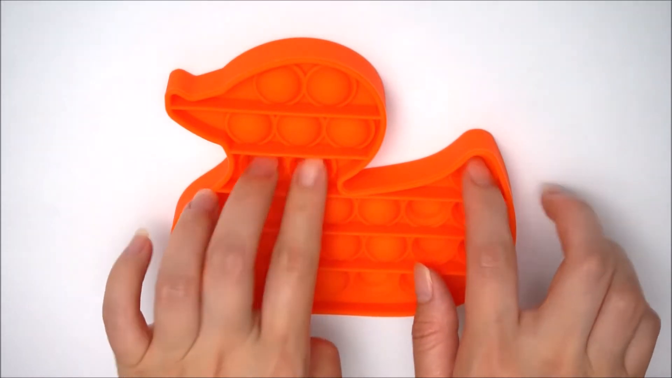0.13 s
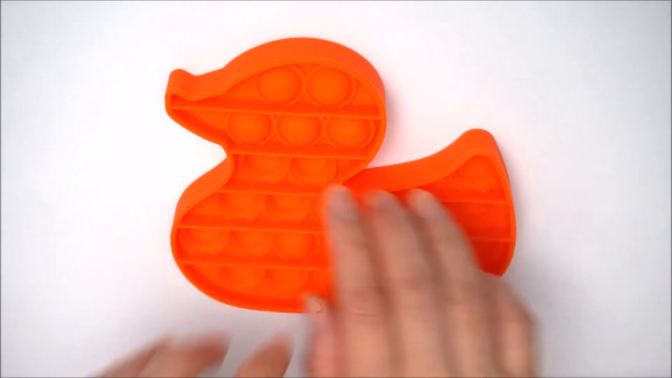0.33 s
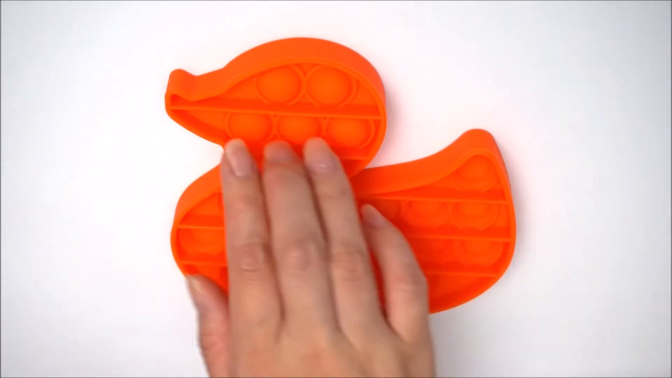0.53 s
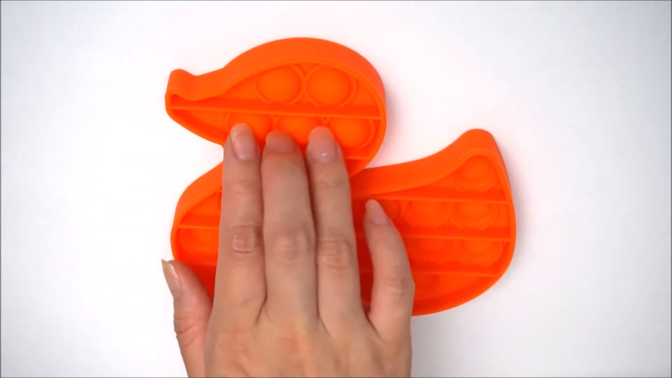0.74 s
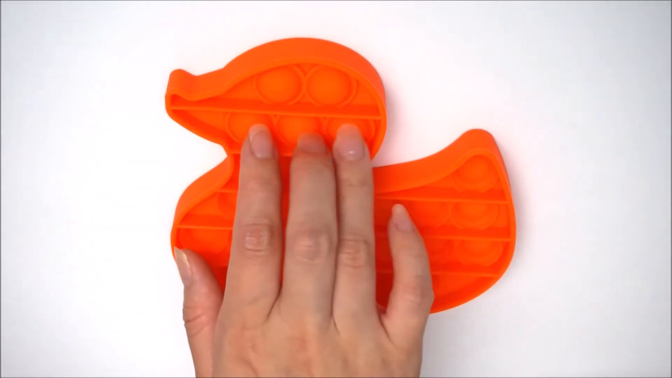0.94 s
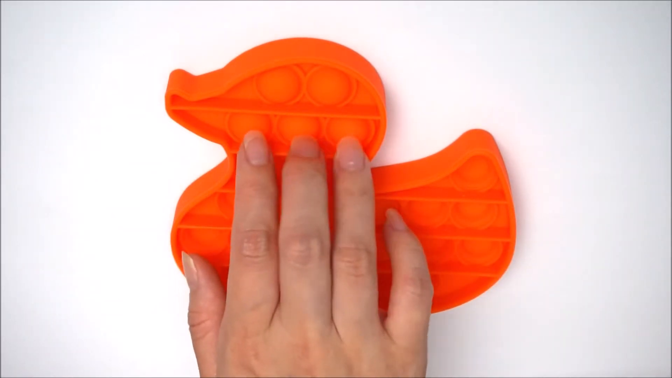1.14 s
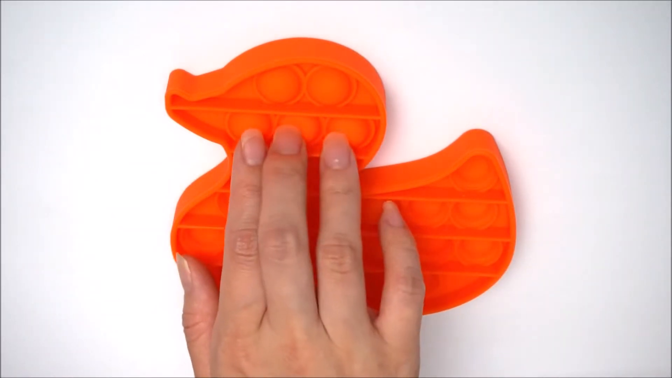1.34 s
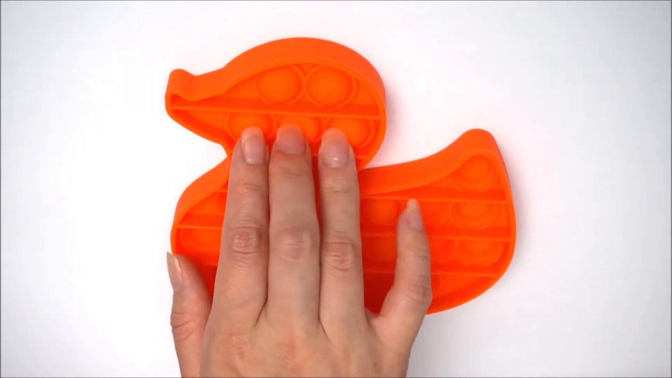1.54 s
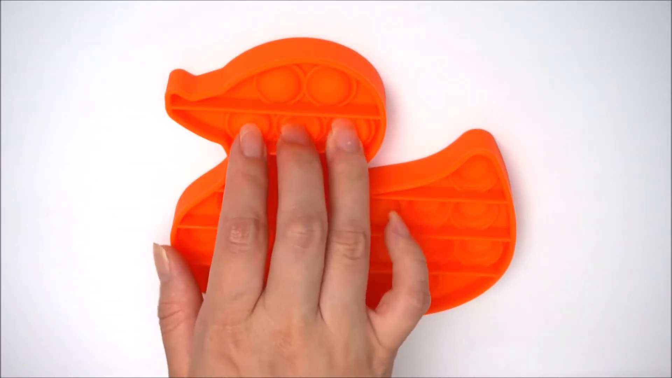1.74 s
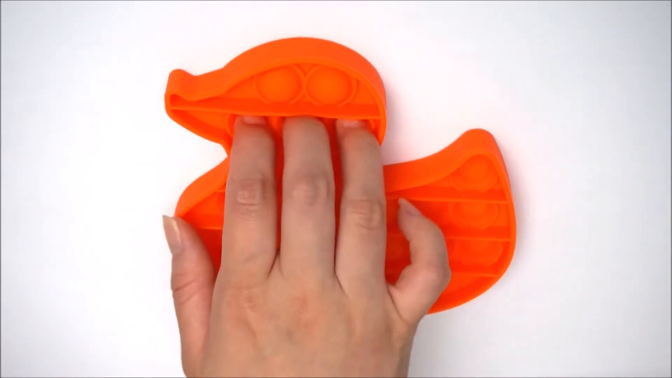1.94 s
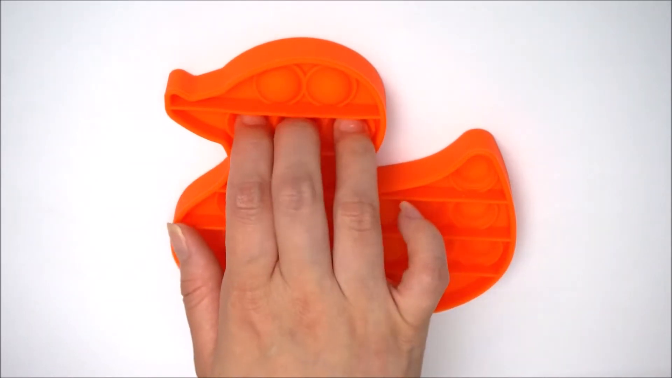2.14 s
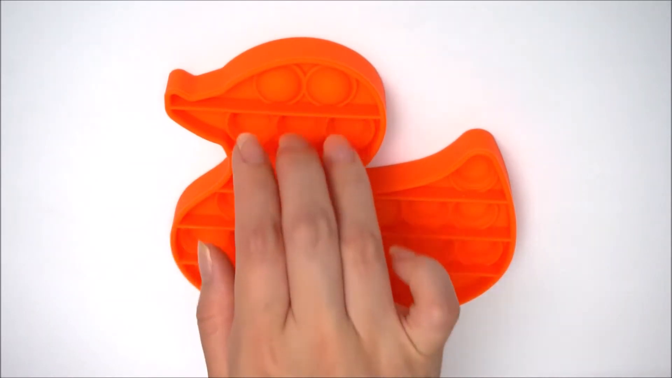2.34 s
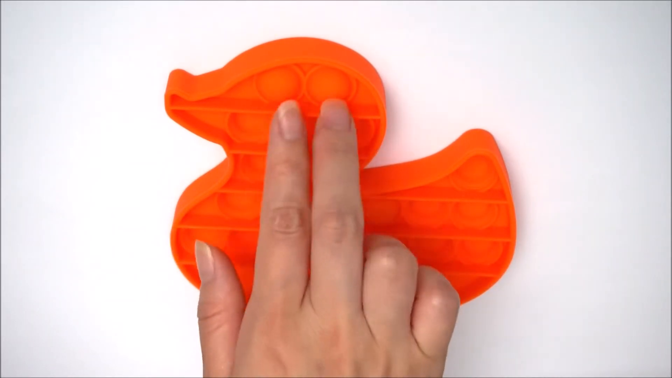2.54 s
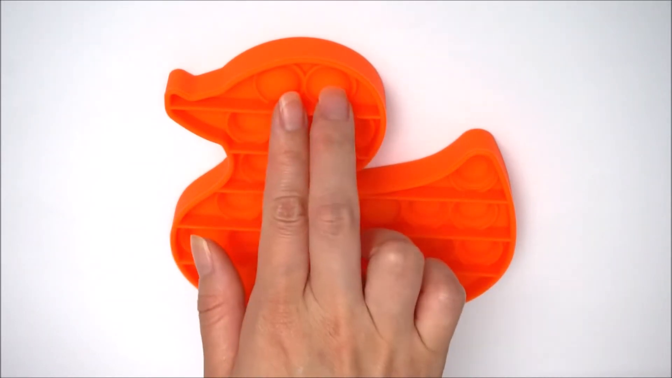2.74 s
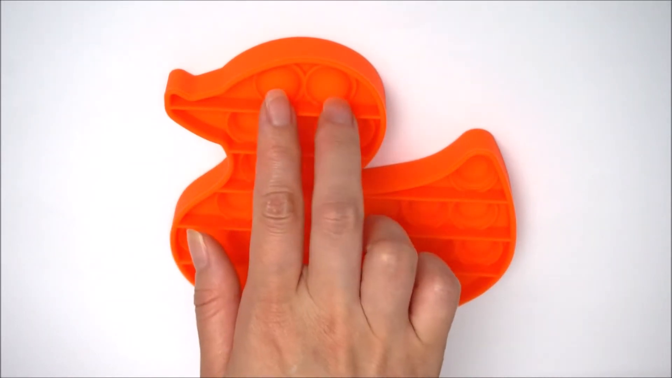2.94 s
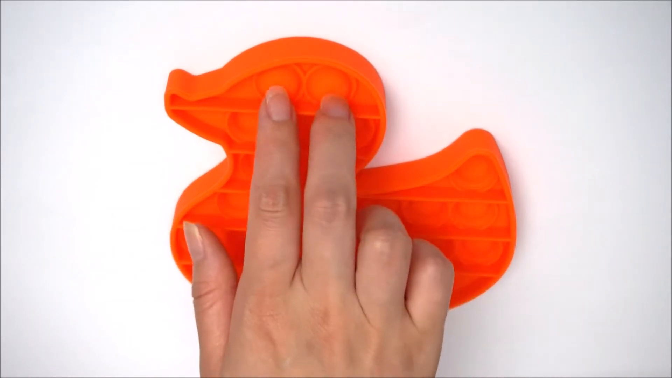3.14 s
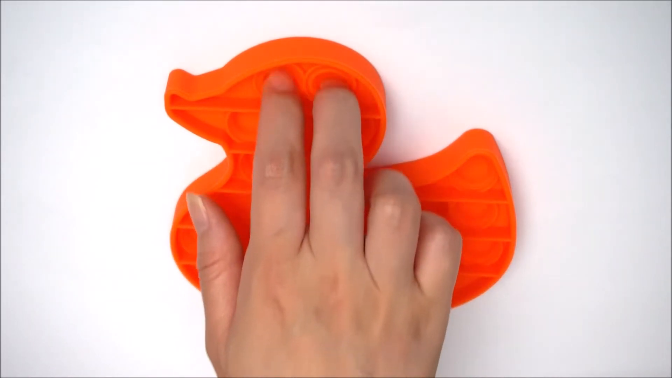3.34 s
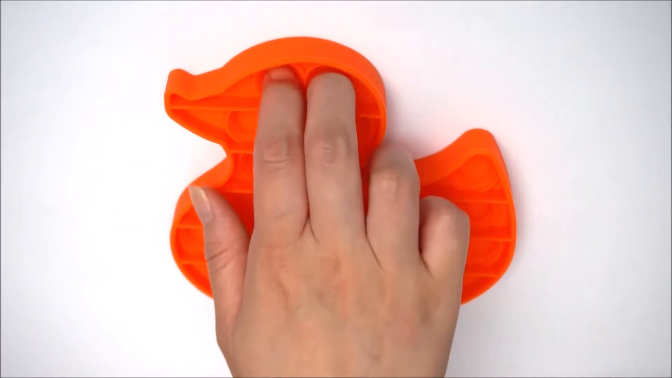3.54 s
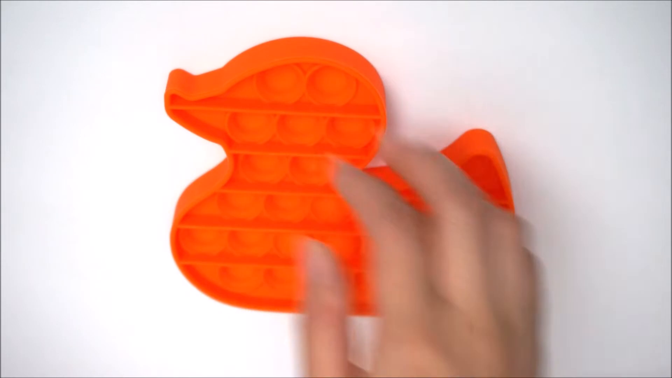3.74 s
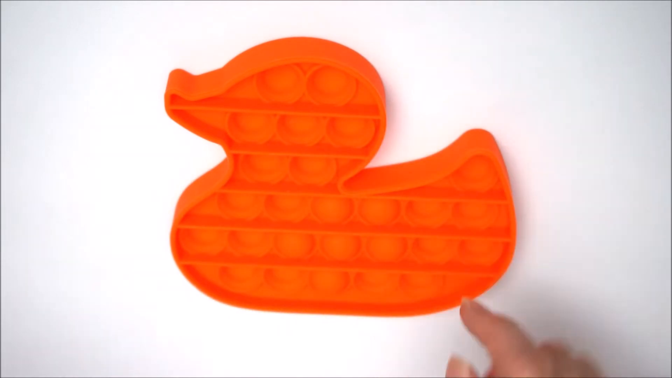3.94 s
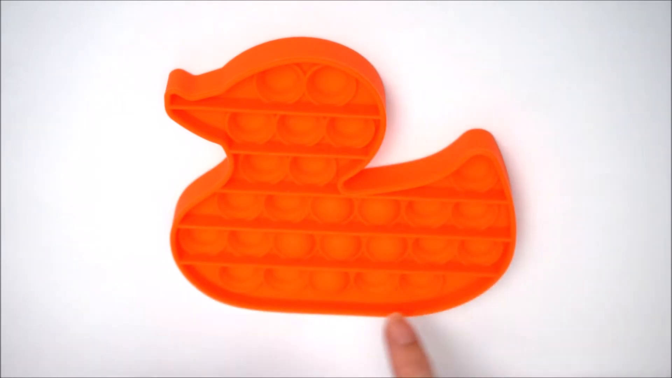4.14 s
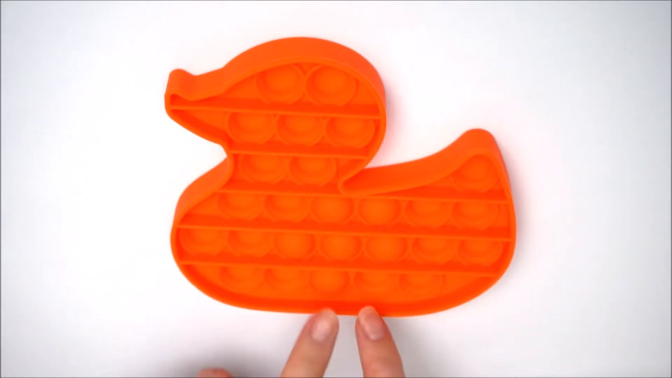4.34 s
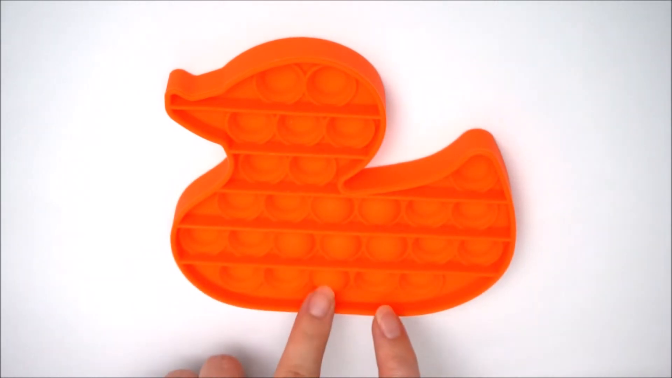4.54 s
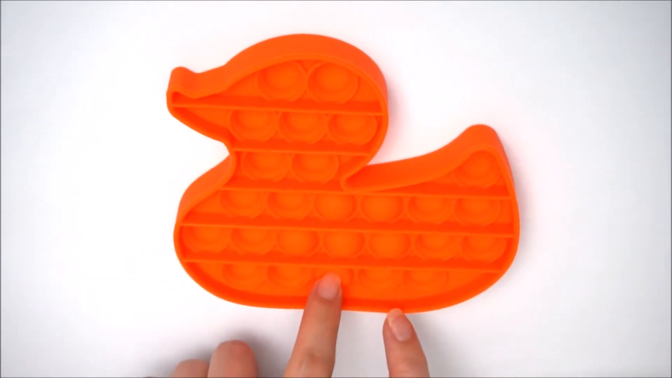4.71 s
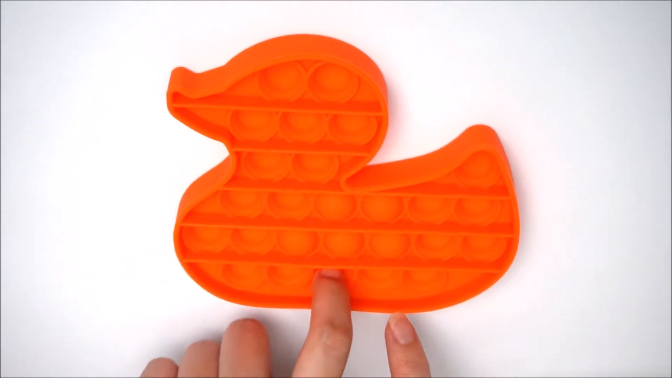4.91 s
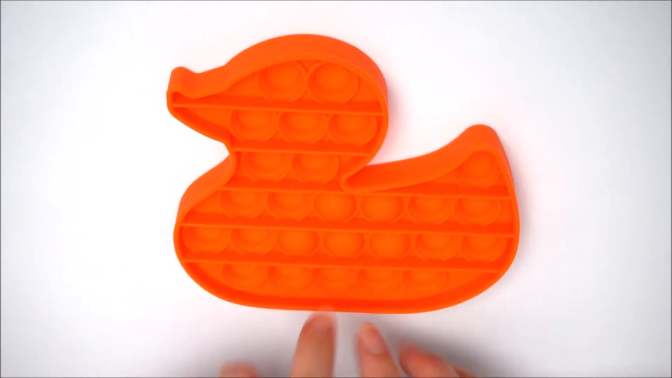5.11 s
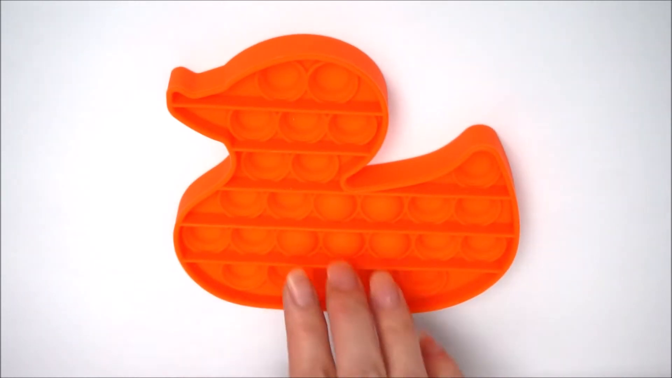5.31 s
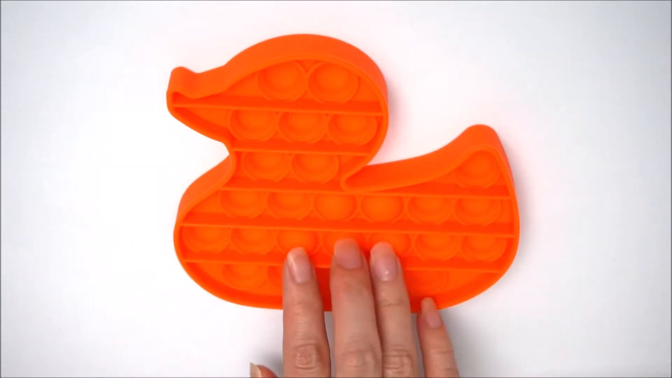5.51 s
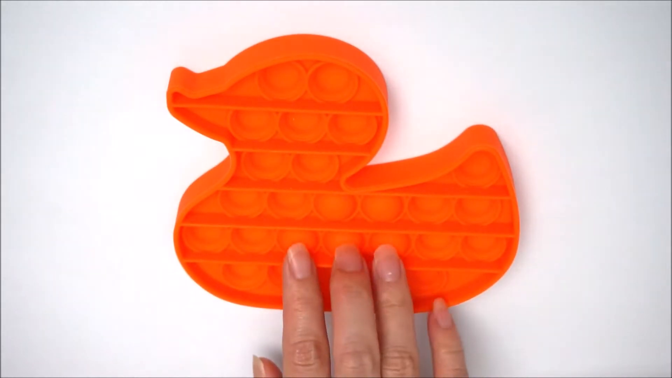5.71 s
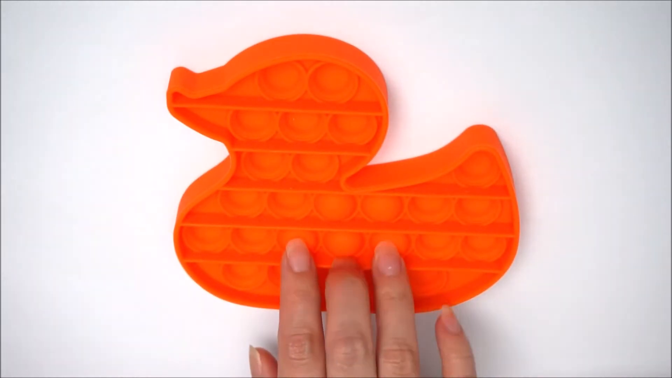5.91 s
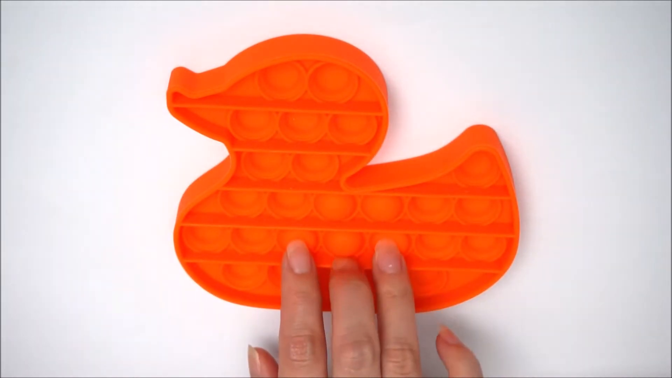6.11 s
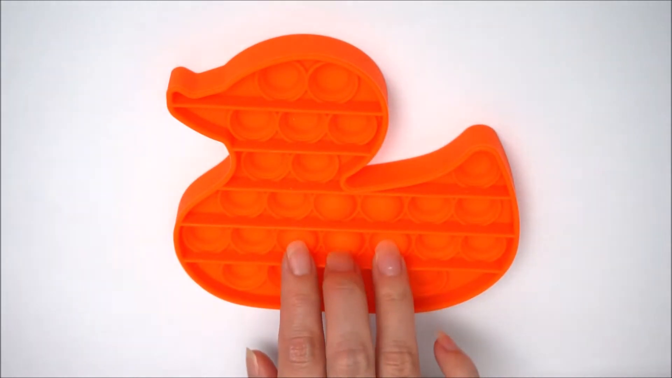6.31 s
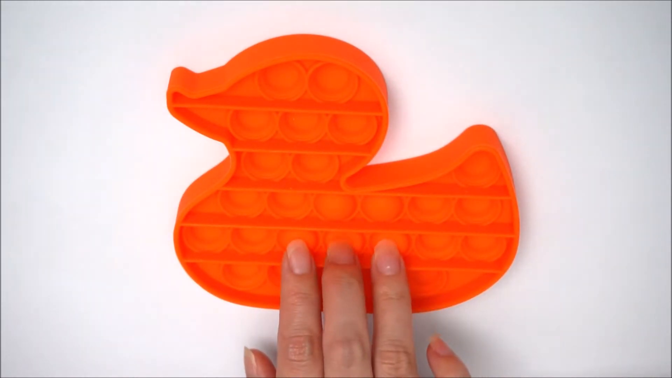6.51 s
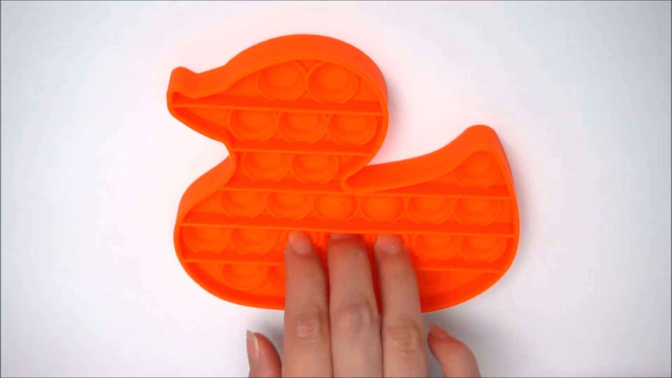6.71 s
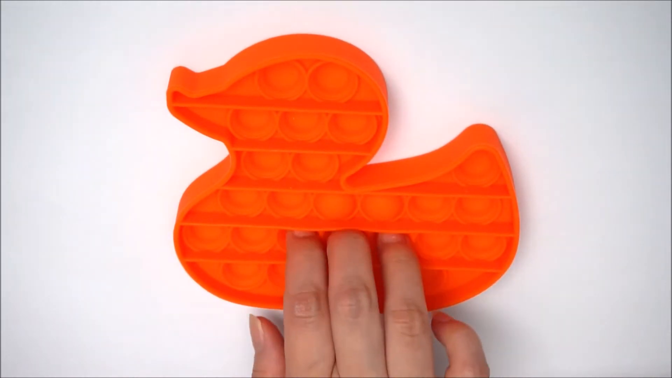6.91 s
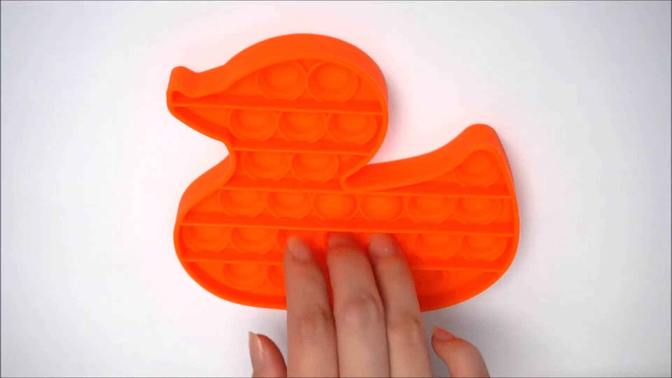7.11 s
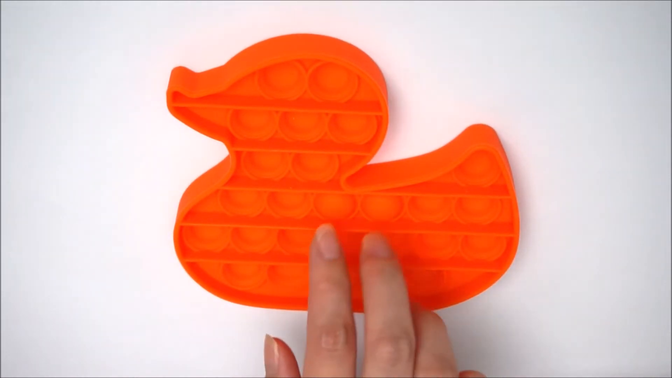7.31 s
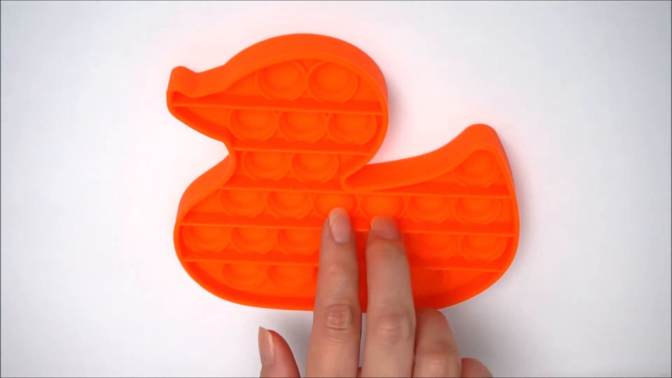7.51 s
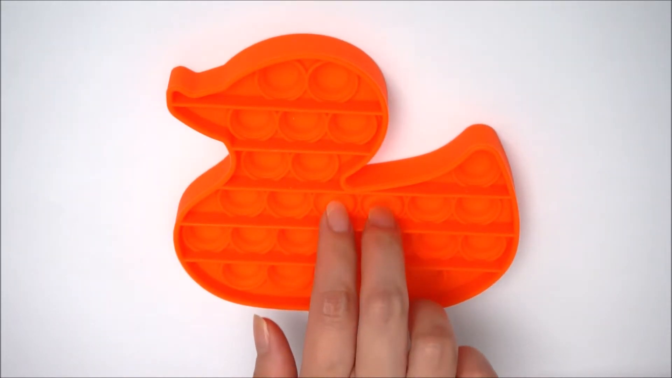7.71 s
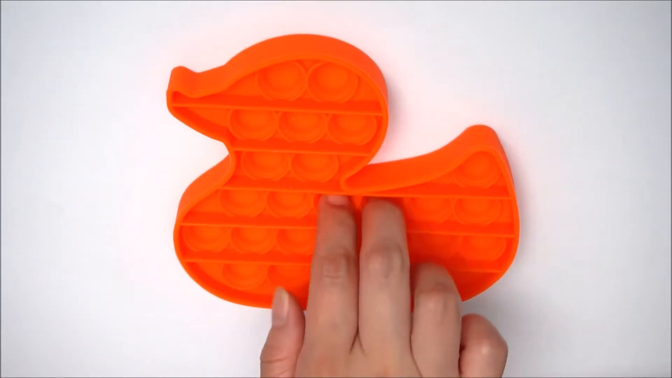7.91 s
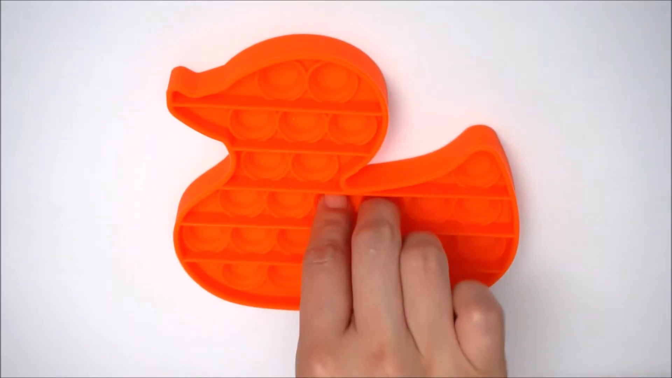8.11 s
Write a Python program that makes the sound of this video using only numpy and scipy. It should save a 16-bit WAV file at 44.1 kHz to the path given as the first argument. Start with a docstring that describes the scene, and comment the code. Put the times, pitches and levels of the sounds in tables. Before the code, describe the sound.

Fingers press the domes of a silicone bubble toy on a table in a small room. A hand brushes the tabletop faintly and a few dull thuds sound, then comes a quick run of soft pops with a brief scuff. Four more short clusters of pops follow, a second or two apart, with another brush and two light fingertip taps in between. A pair of microphones picks up slight echo and a steady hush.

```python
"""Quick runs of soft pops: fingers press the domes of a silicone bubble toy on a table in a small room.
Each dome snaps inside out, which makes its skin and the air trapped under it ring for a moment.
Nearby surfaces and the room echo the pops and two light fingertip taps. A hand brushes the table.
Dull thuds, a scuff and one faint hoot sound over a steady hush, all heard by a pair of microphones."""
import sys
import numpy as np
from scipy import signal
from scipy.fft import rfft, irfft
from scipy.io import wavfile
from scipy.ndimage import uniform_filter1d

SR = 44100
rng = np.random.default_rng(int(sys.argv[2]) if len(sys.argv) > 2 else 0)


def transcribe(signal):
    """Save signal, clipped to [-1, 1], as a 16-bit WAV file at the path in sys.argv[1]."""
    frames = np.atleast_2d(signal).T
    limited = np.clip(frames, -1, 1)
    pcm = np.round(limited * 32767).astype(np.int16)
    wavfile.write(sys.argv[1], SR, pcm)


N = 359415


def undb(db):
    """Turn decibels (dB) into a number to multiply a sound by."""
    return 10 ** (np.asarray(db) / 20)


def on_hz(table, hz):
    """Read between rows of (frequency in Hz, value), giving each octave equal space."""
    freqs, values = np.transpose(table)
    return np.interp(np.log(np.maximum(hz, 1)), np.log(freqs), values)


def noise(colour, alike):
    """Stereo noise at level 1. By frequency, colour sets its strength, alike how well the sides agree."""
    hz = np.arange(N // 2 + 1) * SR / N
    likeness = np.clip(alike(hz), -1, 1)
    mid, side = rfft(rng.standard_normal((2, N))) * colour(hz) * np.sqrt([1 + likeness, 1 - likeness])
    out = irfft(np.array([mid + side, mid - side]), N)
    return out / np.sqrt(np.mean(out ** 2))


def panned(db):
    """Left and right gains, with the left louder by db."""
    return undb(np.array([[db], [-db]]) / 2)


def band(x, lo_hz, hi_hz, order=2):
    """Keep mainly the sound between two frequencies."""
    sos = signal.butter(order, [lo_hz, min(hi_hz, .45 * SR)], "band", fs=SR, output="sos")
    return signal.sosfilt(sos, x)


def swell(peak_s, db, rise_s, fall_s):
    """A gain with a rounded peak: it climbs 20 dB per rise_s, then sinks 20 dB per fall_s."""
    t = np.arange(N) / SR - peak_s
    return uniform_filter1d(undb(db - 20 * np.maximum(-t / rise_s, t / fall_s)), size=1500)


def hush():
    """Room hush whose bass slowly swells; the spaced microphones agree most in the bass."""
    # Tone of the hush. Each row: frequency in Hz, relative level in dB.
    colour = [(13, -61), (22, -9.5), (92, -3), (234, -8.5), (284, -6.5), (417, -8.5), (630, -9), (722, -10),
              (977, -13), (1440, -15), (1940, -17.5), (13300, -27.5), (15700, -29.5)]
    # Each row: frequency in Hz, how alike left and right are (1 the same, 0 unrelated, -1 opposite).
    likeness = [(60, 0.87), (130, 0.82), (290, 0.19), (640, -0.24), (1410, -0.23), (3100, -0.0099),
                (6820, 0.044), (15000, 0.45)]
    # Slow swells. Each row: time in seconds, bass boost in dB.
    bass_swells = [(0, 3), (.3, -0.5), (1, -1.5), (3, -0.5), (3.8, 2), (4.7, 0.3), (5.4, 1.5), (6.3, 0.1),
                   (8.15, -0.5)]
    air = undb(-50.5) * noise(lambda hz: undb(on_hz(colour, hz)), lambda hz: on_hz(likeness, hz))
    bass = signal.sosfiltfilt(signal.butter(1, 900, fs=SR, output="sos"), air)  # below 900 Hz
    times, boost_db = np.transpose(bass_swells)
    return air - bass + bass * undb(np.interp(np.arange(N) / SR, times, boost_db))


def hoot(start_s=.015, end_s=.11, hz=355, db=-55):
    """A short, faint tone with soft ends."""
    t = np.arange(N) / SR
    gate = uniform_filter1d(1. * (t > start_s) * (t < end_s), size=600)
    return undb(db) * np.sqrt(2) * gate * np.sin(2 * np.pi * hz * t)


def thuds(rise_s=.12):
    """Dull bumps come through the floor, nearly the same at both microphones."""
    # Each row: peak time in seconds, level in dB, seconds to fall by 20 dB.
    bumps = [(1.184, -44, .36), (1.514, -47, .15), (1.576, -41.5, .33), (1.852, -47.5, .3),
             (1.964, -39.5, .2), (2.124, -48, .11)]
    # Tone of a thud. Each row: frequency in Hz, relative level in dB.
    colour = [(21, -61), (35, -7), (70, 6), (183, 2.5), (258, -7.5), (299, -2), (1200, -19.5), (1560, -43),
              (2640, -120)]
    gain = np.max([swell(s, db, rise_s, fall_s) for s, db, fall_s in bumps], axis=0)
    return gain * noise(lambda hz: undb(on_hz(colour, hz)), lambda hz: np.exp(-hz / 1500))


def scuff():
    """Something slides briefly: a hiss that is strongest around a few pitches."""
    # Each row: centre frequency in Hz, width in Hz, relative level in dB.
    resonances = [(3240, 1100, 10), (5000, 400, -6), (4500, 10500, 1)]

    def colour(hz):
        return sum(undb(db) / (1 + (2 * (hz - centre) / width) ** 2) for centre, width, db in resonances)
    gain = swell(peak_s=1.97, db=-45.3, rise_s=.09, fall_s=.27)
    return gain * noise(colour, lambda hz: np.full_like(hz, .38))


def brush():
    """A hand sweeps over the smooth table top with a soft, bright hiss."""
    # Each row: peak time in seconds, level in dB, seconds to rise and to fall by 20 dB,
    # left minus right in dB.
    strokes = [(.63, -58, .19, .25, -.45), (.782, -58, .19, .27, -.45), (3.804, -55.5, .35, .3, -3),
               (4.084, -48.3, .75, .48, -1.4)]
    # Tone of the hiss. Each row: frequency in Hz, relative level in dB.
    colour = [(800, -17), (2000, -2.5), (5000, 1), (9000, 4), (12000, 5.5), (16000, 0.5)]
    hiss = noise(lambda hz: undb(on_hz(colour, hz)) * (hz > 500), lambda hz: np.full_like(hz, .35))
    gains = [panned(pan_db) * swell(s, db, rise, fall) for s, db, rise, fall, pan_db in strokes]
    return hiss * np.max(gains, axis=0)


def taps():
    """Fingertips land lightly on the silicone, each a tiny burst of noise."""
    # Each row: start in seconds, level before filtering in dB, low and high edge in Hz,
    # fade time in ms, left minus right in dB.
    touches = [(5.824, -35, 2180, 4400, 4.7, -5), (7.424, -40, 900, 2600, 3, -2.5)]
    out = np.zeros((2, N))
    size = 1500
    for s, db, lo_hz, hi_hz, fade_ms, pan_db in touches:
        fade = np.exp(-np.arange(size) * 1000 / SR / fade_ms)
        burst = band(rng.standard_normal(size) * fade, lo_hz, hi_hz)
        start = int(s * SR)
        out[:, start:start + size] += undb(db) * panned(pan_db) * burst
    return out


def pops(crack_fade_ms=.93, tick_fade_ms=1):
    """Domes snap through: trapped air and skin ring, and the flip cracks, ticks and knocks the table."""
    # Each row is one pop: time in seconds; the air's level in dB, pitch in Hz and ring time in ms;
    # the same three for the skin; rise time in ms; crack, tick and knock levels in dB.
    # Levels are before filtering, and all the others are relative to the air's.
    domes = [(1.8009, -35, 690, 5.5, -21.4, 2856, 1.5, 0.44, -22, -20, -19),
             (1.8384, -19, 680, 9.3, -2, 1800, 1.7, 0.16, -19, -32, -8),
             (1.8546, -19.7, 854, 6.3, -22.6, 2570, 1.8, 0.72, -20, -33, -11),
             (1.8824, -9, 885, 4.4, -25, 1950, 1.9, 0.46, -26, -32, -11),
             (1.8881, -7.5, 1020, 2.2, -7, 1950, 0.5, 0.2, -25, -37, -10.5),
             (1.8964, -11, 910, 11, 0, 1590, 2.2, 0.18, -12.5, -27, -27),
             (3.2918, -19.5, 730, 5.6, -15, 1510, 2.4, 0.42, -32, -37, -13),
             (3.3532, -17, 760, 5.8, -5, 2270, 1, 0.13, -18, -29, -31),
             (3.3737, -8, 920, 9.0, -6, 1440, 4.7, 0.16, -25, -39, -23),
             (3.4138, -6.5, 1050, 4.3, -8.5, 1490, 8, 0.097, -18, -36, -17),
             (4.7399, -24.5, 780, 4.7, 2.5, 1270, 3.8, 0.097, -22, -22, -20),
             (4.7981, -13, 880, 4.8, 4.2, 1385, 4.4, 0.12, -10.5, -25, -29),
             (6.6345, -18, 630, 4, 2, 1850, 1, 0.2, -23, -33, -17),
             (6.6599, -9.5, 900, 2.6, -3, 1700, 0.65, 0.34, -19, -23, -26),
             (6.6949, -24.5, 710, 5, 1, 1340, 3, 0.5, -21.5, -32, -19),
             (6.7279, -19.5, 830, 3.9, -11, 1170, 11, 0.25, -24, -32, -10),
             (6.756, -0.5, 1320, 2.2, -13.5, 2310, 5, 0.12, -29.5, -40, -37),
             (6.787, 0, 1180, 3.6, -26, 2360, 0.91, 0.12, -27.5, -38, -38),
             (7.7887, -12, 880, 3.8, -7.5, 2300, 2.7, 0.16, -20, -12.5, -30),
             (7.8038, -23.6, 790, 6.5, -12, 1100, 7.7, 0.39, -18, -23.2, -18),
             (7.8299, -3, 1090, 2.1, -4, 2180, 2.1, 0.3, -16, -32, -37),
             (7.8486, -1.5, 1240, 2.4, -18, 2150, 0.93, 0.056, -19, -34.4, -37)]
    # The table top's notes. Each row: pitch in Hz, ms to fade by 60 dB, relative level in dB.
    table_notes = [(362, 32.5, -6.5), (487, 9.6, 0)]
    # The crack of the dome's rim. Each row: low and high edge in Hz, relative level in dB.
    rim_bands = [(2100, 3700, -3), (3900, 4760, -0.5)]
    body, cracks, ticks = np.zeros((3, 2, N))
    lead, size = 100, 1800  # samples before the snap, and in the whole pop
    for s, db, air_hz, air_ms, skin_db, skin_hz, skin_ms, rise_ms, crack_db, tick_db, knock_db in domes:
        start = int(s * SR) - lead
        span = slice(start, start + size)
        t = (start + np.arange(size)) / SR - s
        ms = np.maximum(t, 0) * 1000
        rise = np.exp(-.5 * (np.minimum(t, 0) * 1000 / rise_ms) ** 2)
        gain = undb(db) * panned(-.6) * rise
        # the fingertip sinks onto the flipped dome, so the ring holds and then chokes
        air = np.cos(2 * np.pi * air_hz * t) * undb(-60 * (ms / air_ms) ** 2)
        skin = np.cos(2 * np.pi * skin_hz * t) * undb(skin_db - 60 * (ms / skin_ms) ** 2)
        knock = sum(undb(knock_db + note_db - 60 * ms / fade_ms) * np.sin(2 * np.pi * hz * ms / 1000)
                    for hz, fade_ms, note_db in table_notes)
        body[:, span] += gain * (air + skin + knock)
        grit = rng.standard_normal((4, size))
        cracks[:, span] += gain * undb(crack_db) * np.exp(-ms / crack_fade_ms) * grit[3]
        ticks[:, span] += gain * undb(tick_db) * np.exp(-ms / tick_fade_ms) * (grit[0] + .5 * grit[1:3])
    # soft silicone gives off neither deep bass nor treble
    body = band(body, lo_hz=297, hi_hz=3660, order=4)
    rim = sum(undb(db) * band(cracks, lo_hz, hi_hz, order=1) for lo_hz, hi_hz, db in rim_bands)
    return body + rim + band(ticks, lo_hz=5300, hi_hz=10900, order=1)


def room(dry, rise_ms=4, alike_hz=5000, echo_top_hz=4000):
    """Add a few dull echoes from nearby surfaces and the room's fading wash of sound."""
    # The room's fading wash, in bands half an octave wide.
    # Each row: centre in Hz, seconds to fade by 60 dB, level in dB.
    wash_bands = [(270, 0.16, -29), (356, 0.11, -30.5), (500, 0.26, -29.5), (650, 0.28, -41),
                  (1060, 0.16, -32.5), (1410, 0.23, -39), (2160, 0.3, -32.5), (2890, 0.23, -35),
                  (4270, 0.28, -33.5), (5660, 0.21, -35), (9000, 0.18, -31)]
    # Each row is one echo: left and right delay in ms.
    echo_delays = [(2.49, 2.49), (4.15, 4.26), (4.5, 4.62), (6.49, 6.44), (7.53, 7.51), (8.71, 8.55),
                   (9.57, 9.59), (10.3, 10.3), (12.2, 12.2), (15.7, 16.2)]
    # The same echoes. Each row: left and right level in dB, before they are dulled.
    echo_levels = [(-12, -17), (-13, -14), (-10, -13), (-15, -13), (-24, -25), (-20, -17), (-18, -19),
                   (-22, -22), (-23, -23), (-23, -22)]
    t = np.arange(SR // 2) / SR
    half_width = 2 ** .25
    wash = 0
    for hz, fade_s, db in wash_bands:
        hiss = rng.standard_normal((3, len(t)))
        likeness = np.exp(-hz / alike_hz)  # the microphones agree less on shorter waves
        stereo = np.sqrt(likeness) * hiss[0] + np.sqrt(1 - likeness) * hiss[1:]
        wash += undb(db - 60 * t / fade_s) * band(stereo, hz / half_width, hz * half_width, order=1)
    echoes = np.zeros_like(wash)
    for ms, db in zip(echo_delays, echo_levels):
        echoes[[0, 1], np.round(np.array(ms) * SR / 1000).astype(int)] += undb(db)
    echoes = signal.sosfiltfilt(signal.butter(1, echo_top_hz, fs=SR, output="sos"), echoes)
    answer = echoes + wash * (1 - np.exp(-(t * 1000 / rise_ms) ** 2))
    return dry + signal.fftconvolve(dry, answer, axes=1)[:, :N]


def scene():
    """Mix all the sounds; only the pops and taps get the room's echo."""
    return room(pops() + taps()) + thuds() + scuff() + brush() + hoot() + hush()


def record(dry, low_hz=36, top_hz=15750):
    """Trim the deepest bass and cut the highest treble."""
    trimmed = signal.sosfilt(signal.butter(2, low_hz, "high", fs=SR, output="sos"), dry)
    return signal.sosfilt(signal.ellip(10, .2, 70, top_hz, fs=SR, output="sos"), trimmed)


dry = scene()
out = record(dry)
transcribe(out)
```